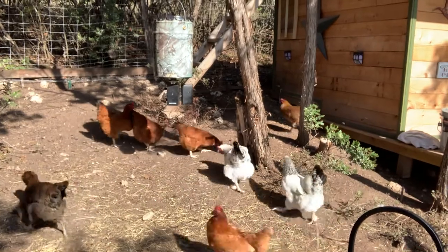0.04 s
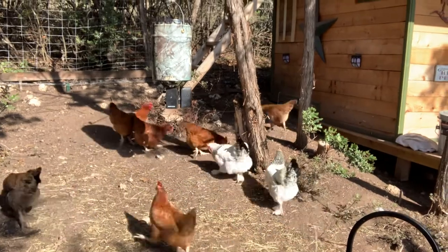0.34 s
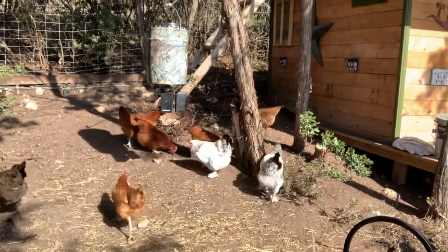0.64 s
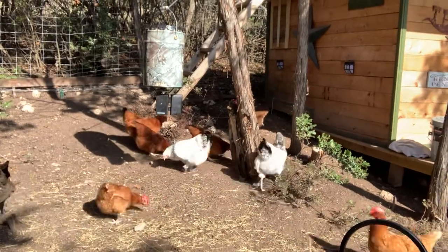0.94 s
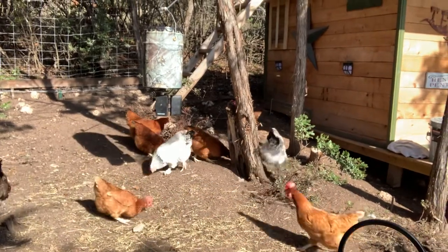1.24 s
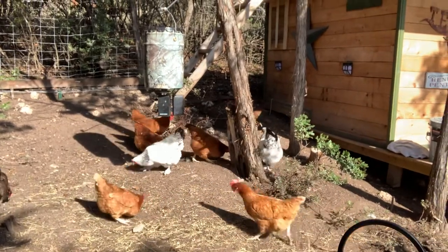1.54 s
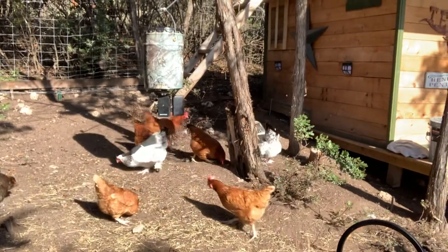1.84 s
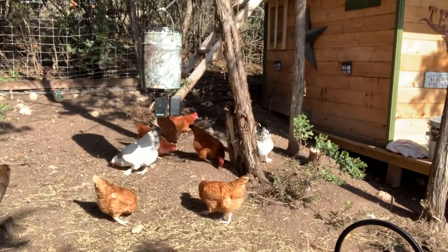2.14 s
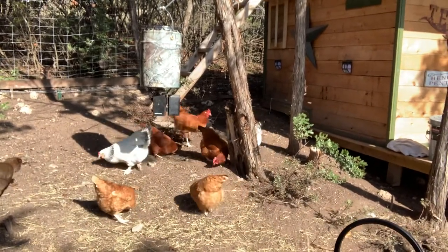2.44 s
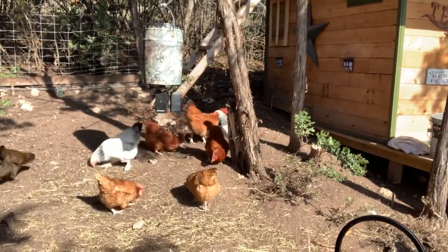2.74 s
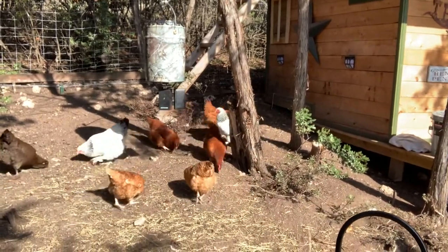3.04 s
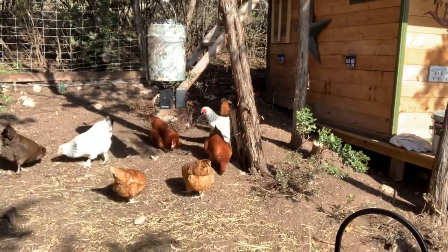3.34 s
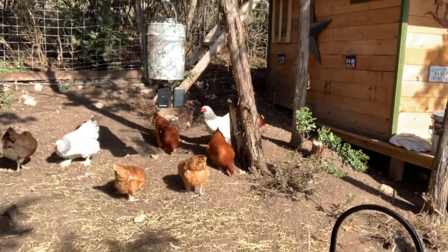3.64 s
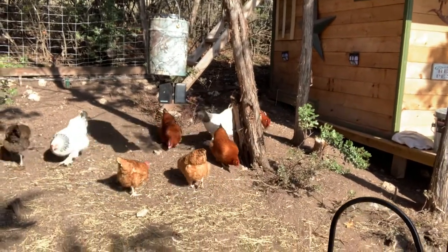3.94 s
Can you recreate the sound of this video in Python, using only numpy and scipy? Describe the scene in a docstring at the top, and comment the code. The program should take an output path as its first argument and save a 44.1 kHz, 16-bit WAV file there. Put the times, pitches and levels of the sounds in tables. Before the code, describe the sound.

Feed pellets rattle off a whirling metal feeder plate outdoors, thinning to single ticks.

```python
"""Spinning feeder in a yard

A motor whirls the small metal plate of a hanging feeder; pellets drop on it and are flung away.
Each strike clicks and rings the plate, whose turning splits its tones into beating pairs; pellets
also tap on it and chink, knock and patter on things nearby. After two seconds the motor cuts out, the
plate coasts and the last pellets fall singly, over a low outdoor rumble and a far bird."""
import sys
import numpy as np
from scipy import signal
from scipy.fft import rfft, irfft, next_fast_len
from scipy.io import wavfile

SR = 44100
rng = np.random.default_rng(int(sys.argv[2]) if len(sys.argv) > 2 else 0)


def master(y):
    """Save y as 16-bit WAV."""
    cut = np.clip(np.atleast_2d(y).T, -1, 1)
    pcm = np.round(cut * 32767)  # scale
    wavfile.write(sys.argv[1], SR, pcm.astype(np.int16))


N = 176400
FFT_SIZE = next_fast_len(N + 2048)

# Colour of the outdoor bed. Each row: frequency in Hz, relative level in dB.
YARD_COLOUR = [(20, -36), (35, -17), (58, 0), (100, -6), (150, -14), (250, -17.5), (400, -20), (560, -14),
               (850, -27), (1500, -32), (3000, -35), (8000, -42), (16000, -50)]
# Faint steady hum in the bed. Each row: pitch in Hz, level in dB.
YARD_HUM = [(291, -65)]
# The plate at speed, then coasting. Each row: time in seconds, speed in turns per second.
PLATE_SPEED = [(0, 119.5), (1.95, 119), (2.55, 84), (3.1, 61), (3.75, 44), (4, 39)]
# Level ride on the stream of small pellets. Each row: time in seconds, relative level in dB.
PELLET_FLOW = [(0.0, -25), (0.15, -28), (0.25, -35), (0.38, -29), (0.58, -33), (0.705, -43), (0.73, -29),
               (1.08, -29), (1.39, -26), (1.47, -34), (1.75, -28), (1.92, -38), (2.04, -28), (2.32, -27),
               (2.5, -35), (2.76, -54), (3.02, -40), (3.26, -48), (3.44, -38), (3.56, -54), (4.0, -64)]
# Clumps and single pellets hitting the plate hard. Each row: start in seconds, relative level in dB.
HARD_STRIKES = [(0.047, -22), (0.066, -23), (0.103, -28), (0.204, -27), (0.287, -25.5), (0.329, -26),
                (0.388, -25), (0.459, -30), (0.533, -28), (0.554, -29), (0.624, -29), (0.713, -26.5),
                (0.781, -28), (0.853, -25), (0.879, -24), (0.919, -26), (0.942, -25), (0.973, -24),
                (1.011, -24), (1.035, -23), (1.079, -20), (1.148, -21), (1.208, -25), (1.25, -26),
                (1.332, -25), (1.361, -26), (1.385, -26), (1.438, -28), (1.51, -29), (1.538, -20),
                (1.583, -29), (1.641, -25), (1.681, -25), (1.707, -17), (1.797, -22), (1.873, -28),
                (1.947, -26), (2.002, -25), (2.016, -22), (2.042, -25), (2.093, -24), (2.246, -22),
                (2.295, -20), (2.343, -27), (2.428, -29), (2.452, -29), (2.527, -30), (2.546, -28),
                (2.569, -30), (2.627, -30), (2.661, -34), (2.711, -34), (2.793, -37.5), (2.832, -35),
                (2.855, -35), (2.872, -29), (2.947, -30.5), (2.974, -33), (3.015, -32), (3.099, -31),
                (3.124, -34), (3.327, -33), (3.369, -35), (3.419, -35), (3.461, -35), (3.489, -38),
                (3.585, -39), (3.619, -42), (3.7, -42), (3.729, -30), (3.87, -49), (3.891, -38)]
# Colour of a pellet's click. Each row: frequency in Hz, relative level in dB.
CLICK_COLOUR = [(380, -28), (550, -7), (850, -22), (1300, -13), (2200, -9.7), (2900, -5), (3400, -7.5),
                (4050, -9), (4600, -2), (5100, -5), (5900, 1.5), (6800, -5.5), (7900, -6), (9000, 2),
                (9900, 1), (10500, 3.5), (11300, 0), (12600, 1.5), (13800, 1), (14800, -5), (15700, -4.5)]
# The plate's ringing modes. Each row: pitch in Hz, relative level in dB, time to fall 60 dB in seconds,
# share from 0 to 1 that swings round with the plate.
PLATE_MODES = [(1535, -23, .12, .1), (1630, -20, .22, .4), (3696, -19, .22, .97), (4315, -16, .2, .5),
               (4640, -17, .16, .6), (4760, -15.5, .14, .5), (5755, -16.5, .14, .8), (5875, -12.5, .18, .4),
               (6130, -18, .07, .6), (7400, -22, .06, .6), (8922, -4, .19, .95), (10550, -11, .07, .8),
               (12230, -19, .1, .4), (12885, -21, .1, .3)]
# Short pitched taps of pellets, some on the plate, others on wood and ground.
# Each row: start in seconds, relative level in dB, pitch in Hz.
PELLET_TAPS = [(0.022, -24, 1630), (0.152, -30, 1640), (0.437, -25, 2300), (0.654, -33, 2150),
               (0.988, -22, 1950), (1.069, -24, 1530), (1.197, -27, 1200), (1.297, -29, 1690),
               (1.349, -28, 1100), (1.39, -22, 2300), (1.404, -24, 2200), (1.413, -26, 1900),
               (1.628, -28, 1830), (1.667, -28, 2000), (1.706, -23, 1530), (1.834, -28, 2470),
               (2.601, -26, 1710), (3.424, -34, 2300)]
# Hits that bring out one mode. Each row: start in seconds, the mode's pitch in Hz, relative level in dB,
# attack in seconds.
MODE_PINGS = [(0.18, 3696, -35, .045), (0.805, 1630, -40, .012), (0.945, 3696, -37.5, .045),
              (1.08, 1630, -40, .012), (1.2, 1630, -36, .012), (1.535, 3696, -43, .008),
              (2.243, 3696, -39, .012), (2.43, 3696, -45, .015), (2.62, 1630, -46, .04),
              (3.01, 1630, -40, .01), (3.105, 1630, -46, .01), (3.46, 1630, -43.5, .01)]
# A far bird's calls. Each row: start in seconds, level in dB.
BIRD_CHIRPS = [(3.59, -66), (3.76, -64), (3.935, -64)]
# Stereo width. Each row: frequency in Hz, level of scattered against direct sound in dB.
STEREO_WIDTH = [(100, -10), (700, -5), (1600, -12), (3000, -6), (5000, -6), (7200, -6), (7900, -36),
                (9600, -32), (11300, -4), (12300, -7), (13200, -28), (16000, -25)]
# Stereo balance. Each row: frequency in Hz, level of left over right in dB.
STEREO_BALANCE = [(100, -1), (700, 1), (2400, -1.5), (3700, -3.5), (4400, 2), (5800, 3.5), (7000, 0),
                  (16000, 0)]
# Stereo phase. Each row: frequency in Hz, lead of left over right in radians.
STEREO_PHASE = [(100, 0), (3300, 0), (4400, 1.6), (5500, 1.6), (6700, .3), (7300, 1), (7700, 3.14),
                (9900, 3.16), (11500, 4.7), (12800, 6.28), (16000, 6.28)]

BOUNCE_DB = [1, 0, -1, -3, -5]  # accents on the successive contacts of one strike
CLICK_T60_S, SCATTER_T60_S = .014, .095
EMPTY_RING_DB = 2.5  # the plate rings more freely as it slows and empties, rising toward this boost
DIRECT_ONLY = np.array([[1], [0]])  # feeder sounds have two rows: direct and scattered
SIDES = np.array([[1], [-1]])  # left and right in opposite polarity


def undb(db):
    """Decibels to gain."""
    return 10 ** (np.asarray(db) / 20)


def curve(rows):
    """A control joined by straight lines in time."""
    return np.interp(np.arange(N) / SR, *np.array(rows).T)


def by_hz(rows):
    """A table read at every frequency, on a log axis."""
    hz, value = np.array(rows).T
    return np.interp(np.log(np.arange(FFT_SIZE // 2 + 1) * SR / FFT_SIZE + 1), np.log(hz), value)


def equalise(x, gain):
    """Filter by a gain for every frequency."""
    return irfft(rfft(x, FFT_SIZE) * gain, FFT_SIZE)[..., :N]


def noise(colour):
    """Two unrelated coloured noises, together of rms 1."""
    x = equalise(rng.standard_normal((2, N)), undb(by_hz(colour)))
    return x / x.std()


def ring(x, hz, t60):
    """A decaying mode that keeps the energy of each blow."""
    decay, step = np.log(1000) / (t60 * SR), 2 * np.pi * hz / SR
    feedback = [1, -2 * np.exp(-decay) * np.cos(step), np.exp(-2 * decay)]
    return signal.lfilter([2 * np.sqrt(decay) * np.sin(step)], feedback, x + 1e-18)


def tail(energy, t60):
    """Spread each blow's energy over an exponential tail."""
    keep = np.exp(-2 * np.log(1000) / (t60 * SR))
    return signal.lfilter([1 - keep], [1, -keep], energy + 1e-18)


def yard(rumble_db=-51, width_db=-11):
    """A bed of low outdoor rumble with a faint hum."""
    t = np.arange(N) / SR
    hum = sum(undb(db) * np.sqrt(2) * np.sin(2 * np.pi * hz * t) for hz, db in YARD_HUM)
    mid, side = noise(YARD_COLOUR)
    return hum + undb(rumble_db) * (mid + undb(width_db) * side * SIDES)


def motor(speed, angle, gain_db=-55, housing_hz=550, half_width_hz=95):
    """Unbalance hums once a turn; its harmonics whirr in the housing and sink as the plate coasts."""
    effort, whirr = speed / speed.max(), 0
    for harmonic in range(2, 9):
        detune = (harmonic * speed - housing_hz) / half_width_hz
        whirr += np.sin(harmonic * angle + rng.uniform(0, 2 * np.pi)) / (1 + detune ** 2)
    flutter = 1 + .9 * noise([(1, 0), (25, 0), (120, -30), (500, -100)])
    hum = np.sqrt(2) * effort ** 4 * np.sin(angle) * DIRECT_ONLY
    return undb(gain_db) * (hum + effort * whirr * flutter)


def pellet_stream(per_second=480, spread_db=3.3):
    """Small pellets make random contacts of uneven strength, rms 1."""
    contacts = rng.random(N) < per_second / SR
    stream = contacts * undb(spread_db * np.clip(rng.standard_normal(N), -2, 2))
    return stream / stream.std()


def blows(slowness, bounce_s=.0028, strike_db=21.5, stream_db=-.6):
    """Force on the plate: the pellet stream, plus hard strikes that bounce for longer as it slows."""
    force = np.zeros(N)
    for start, db in HARD_STRIKES:
        gaps = rng.uniform(.5, 1.5, len(BOUNCE_DB))
        times = start + bounce_s * np.sqrt(slowness[int(start * SR)]) * (np.cumsum(gaps) - gaps[0])
        contacts = np.clip((times * SR).astype(int), 0, N - 1)
        force[contacts] += undb(db + strike_db + np.array(BOUNCE_DB))
    return force + pellet_stream() * undb(curve(PELLET_FLOW) + stream_db)


def plate(force, angle, uneven=.35, gain_db=-.4):
    """Each blow rings the modes afresh; their lobes sweep past the listener once a turn."""
    out, push, hits = 0, np.zeros((2, N)), np.flatnonzero(force)
    for hz, db, t60, swing in PLATE_MODES:
        lobe = rng.uniform(0, 2 * np.pi, (2, 1))
        polarity = rng.choice([-1, 1], (2, len(hits)))
        push[:, hits] = force[hits] * polarity * (1 + uneven * rng.standard_normal(polarity.shape))
        sweep = np.sqrt(1 - swing ** 2) + np.sqrt(2) * swing * np.cos(angle - lobe)
        out += (ring(undb(db + gain_db) * push, hz, t60) + pings(hz, t60)) * sweep
    return out


def clicks(force, scatter_share=.55, gain_db=-1.4):
    """The bright crack of each pellet and its scatter between plate, drum and ground."""
    crack = (1 - scatter_share) * tail(force ** 2, CLICK_T60_S)
    scatter = scatter_share * tail(force ** 2, SCATTER_T60_S)
    return undb(gain_db) * np.sqrt(crack + scatter) * noise(CLICK_COLOUR)


def chinks(force, count=260, low_hz=3800, high_hz=6900, t60=.03, gain_db=-4.5):
    """Pellets glance off the metal drum and bracket, each with a short ring of its own pitch."""
    out, t = np.zeros((2, N + SR // 10)), np.arange(SR // 10) / SR
    activity = np.sqrt(tail(force ** 2, SCATTER_T60_S))
    for when, pitch, size, phase in rng.random((count, 4)):
        start, hz = int(when * N), low_hz * (high_hz / low_hz) ** pitch
        tone = np.sin(2 * np.pi * (hz * t + np.array([[0], [phase]]))) * undb(-60 * t / t60)
        out[:, start:start + len(t)] += undb(gain_db) * size * activity[start] * tone
    return out[:, :N]


def patter(force, band_hz=(1000, 4000), flight_t60=1.3, gain_db=-27):
    """Flung pellets keep landing softly on the ground through the gaps in the flow."""
    landings = tail(force ** 2, flight_t60) * tail(pellet_stream() ** 2, CLICK_T60_S)
    band = signal.butter(2, band_hz, "band", fs=SR, output="sos")
    soil = signal.sosfilt(band, rng.standard_normal((2, N)))
    return undb(gain_db) * np.sqrt(landings) * soil / soil.std()


def pellet_taps(body_hz=(950, 3000), body_db=-2, relative_width=.3, t60=.045, gain_db=-3):
    """Short pitched taps of pellets, some on the plate, others on wood and ground."""
    out, t = np.zeros((2, N + SR // 10)), np.arange(SR // 10) / SR
    band = signal.butter(2, body_hz, "band", fs=SR, output="sos")
    for start_s, db, hz in PELLET_TAPS:
        grit = rng.standard_normal((2, 2, len(t)))
        tone = signal.lfilter(*signal.iirpeak(hz, 1 / relative_width, fs=SR), grit[0])
        body = signal.sosfilt(band, grit[1])
        tap = (tone / tone.std() + undb(body_db) * body / body.std()) / 2
        start = int(start_s * SR)
        out[:, start:start + len(t)] += undb(db + gain_db - 60 * t / t60) * tap
    return out[:, :N]


def pings(hz, t60):
    """The plate mode at this pitch swells while a pellet chatters on it, then rings out."""
    out = np.zeros(N)
    for start, mode_hz, db, attack in MODE_PINGS:
        if mode_hz == hz:
            t = np.maximum(np.arange(N) / SR - start, 0)
            swell = np.minimum(t / attack, 1) * undb(-60 * np.maximum(t - attack, 0) / t60)
            out += undb(db) * np.sqrt(2) * swell * np.sin(2 * np.pi * hz * t)
    return out * DIRECT_ONLY


def bird(length_s=.075, start_hz=3020, fall_hz=600):
    """Thin, distant whistles that hold their pitch, then drop."""
    out = np.zeros(N)
    for start, db in BIRD_CHIRPS:
        progress = np.clip((np.arange(N) / SR - start) / length_s, 0, 1)
        whistle = np.sin(2 * np.pi * np.cumsum(start_hz - fall_hz * progress ** 3) / SR)
        out += undb(db) * np.sqrt(2) * np.sin(np.pi * progress) * whistle
    return out


def stereo_image(direct, scattered):
    """Direct sound is the mid and scattered sound the side; left and right differ in level and phase."""
    width = undb(by_hz(STEREO_WIDTH))
    mid = equalise(direct, 1 / np.hypot(1, width))
    side = equalise(scattered, width / np.hypot(1, width))
    balance = undb(SIDES * by_hz(STEREO_BALANCE) / 2)
    phase_shift = np.exp(.5j * SIDES * by_hz(STEREO_PHASE))
    return equalise(mid + SIDES * side, balance * phase_shift)


def scene():
    """The feeder, spread in stereo over the yard bed and the bird."""
    speed = curve(PLATE_SPEED)
    angle, slowness = 2 * np.pi * np.cumsum(speed) / SR, speed.max() / speed
    bed, drive, taps = yard(), motor(speed, angle), pellet_taps()
    force = blows(slowness)
    ringing = plate(force * undb(EMPTY_RING_DB * (1 - 1 / slowness)), angle)
    direct, scattered = drive + taps + clicks(force) + ringing + chinks(force) + patter(force)
    return stereo_image(direct, scattered) + bed + bird()


def record(dry):
    """A steep high cut takes the very top off the mix."""
    return signal.sosfilt(signal.ellip(10, .2, 80, 15850, fs=SR, output="sos"), dry)


dry = scene()
out = record(dry)
master(out)
```